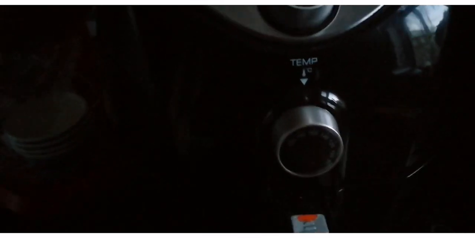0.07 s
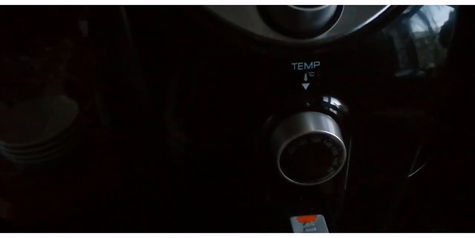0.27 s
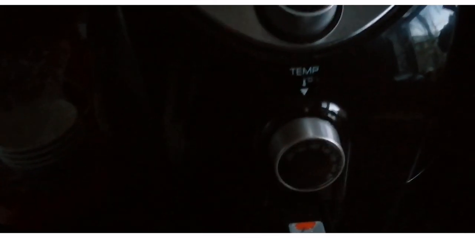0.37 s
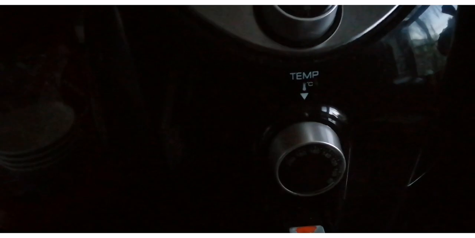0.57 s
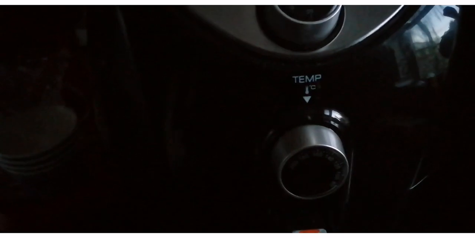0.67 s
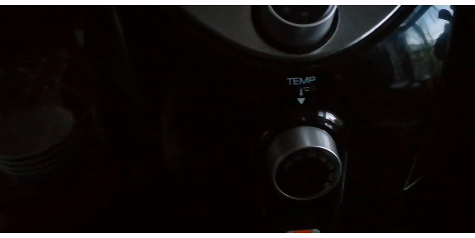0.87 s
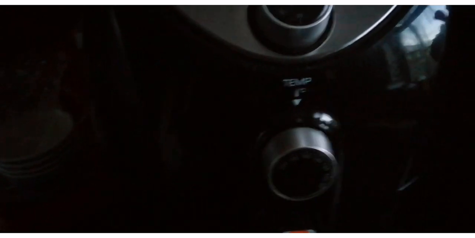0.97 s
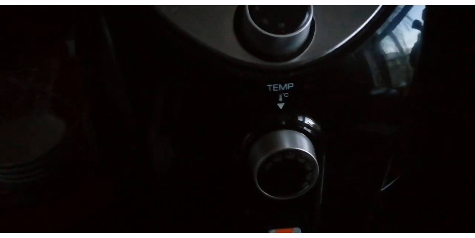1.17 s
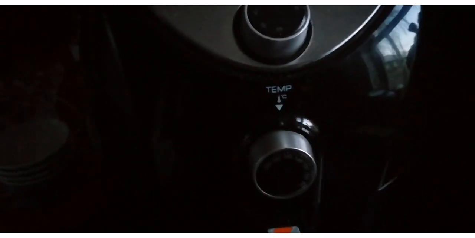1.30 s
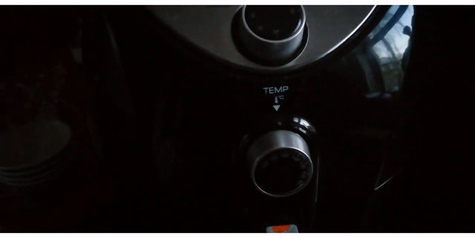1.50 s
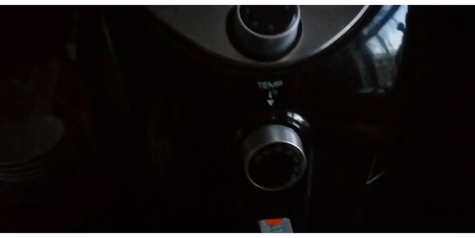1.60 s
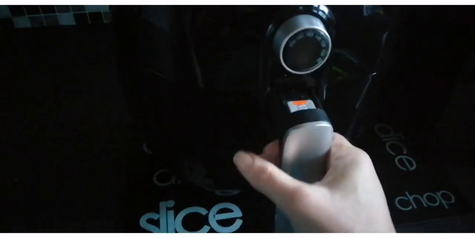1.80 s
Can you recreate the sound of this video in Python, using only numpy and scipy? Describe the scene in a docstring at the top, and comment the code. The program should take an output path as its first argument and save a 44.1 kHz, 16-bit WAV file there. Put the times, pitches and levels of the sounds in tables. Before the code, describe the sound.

Sharp clack of an air fryer basket latching, then a thud, faint ticks and fan hum.

```python
"""An air fryer's basket is pushed home, close by, in a small kitchen.
The plastic housing groans as the basket slides, the latch snaps with a sharp double clack
and the basket thuds into its seat. With a second thud the fan starts and runs up,
whining briefly and humming, while the clockwork timer ticks."""
import sys
import numpy as np
from scipy import signal
from scipy.fft import rfft, irfft, next_fast_len
from scipy.io import wavfile

SR = 44100
rng = np.random.default_rng(int(sys.argv[2]) if len(sys.argv) > 2 else 0)


def dump_mix(stems):
    """Bounce the given channels to the path in sys.argv[1] as a 16-bit WAV at rate SR."""
    frames = np.atleast_2d(stems).T  # one column per channel
    limited = np.clip(frames, -1, 1)  # hard clip at full scale
    pcm = np.round(limited * 32767).astype(np.int16)
    wavfile.write(sys.argv[1], SR, pcm)


N = 81585
T = np.arange(N) / SR


def from_db(db):
    """Turn decibels into a number to multiply by."""
    return 10 ** (np.asarray(db) / 20)


def level(rows):
    """Join (t/s, level/dB) points into a volume curve."""
    return from_db(np.interp(T, *np.transpose(rows)))


def at_hz(points, hz):
    """Read between a table's frequencies, giving each octave equal room."""
    freqs, values = np.transpose(points)
    return np.interp(np.log(hz + 1), np.log(freqs), values)


def pan(db):
    """Left and right volumes, with the left louder by db (negative leans right)."""
    gains = from_db(np.array([[db], [-db]]) / 2)
    return gains / np.sqrt(np.mean(gains ** 2))


# how alike left and right sound: f/Hz, likeness (1 = the same, 0 = unrelated)
STEREO_LIKENESS = [(50, 0.74), (250, 0.93), (500, 0.65), (1000, 0.22), (3000, -0.064), (7000, -0.041),
                   (16000, -0.25)]

def noise(spectrum):
    """Stereo noise of strength 1, shaped by (f/Hz, level/dB) points; the treble spreads widest."""
    size = next_fast_len(N)
    hz = np.arange(size // 2 + 1) * SR / size
    alike = np.clip(at_hz(STEREO_LIKENESS, hz), -1, 1)
    mid, side = rfft(rng.standard_normal((2, size)))
    stereo = np.sqrt(1 + alike) * mid + np.sqrt(1 - alike) * side * [[1], [-1]]
    x = irfft(from_db(at_hz(spectrum, hz)) * stereo, size)[:, :N]
    return x / x.std()


def drift(rate_hz):
    """A smooth random wobble of typical size 1; a higher rate wobbles faster."""
    pole = np.exp(-2 * np.pi * rate_hz / SR)
    x = signal.lfilter([1], [1, -2 * pole, pole * pole], rng.standard_normal(2 * N))[N:]
    return (x - x.mean()) / x.std()


def decay(start, fade_s, rise_s):
    """The volume of a blow: it rises quickly and drops 60 dB in each fade time."""
    age = np.maximum(T - start, 0)
    attack = 1 - np.exp(-(age / rise_s) ** 2)
    return attack * np.exp(-np.minimum(np.log(1000) * age / fade_s, 40))


def strike(start, notes, rise_s, stretch=1, lag_s=0):
    """A struck part rings at its own notes; the waves on the right run lag_s behind."""
    out = np.zeros((2, N))
    for hz, db, fade_s in notes:
        phase = 2 * np.pi * hz * (T - start - np.array([[0], [lag_s]])) + rng.normal(0, 0.88)
        out += from_db(db + rng.normal(0, 1)) * decay(start, fade_s * stretch, rise_s) * np.sin(phase)
    return out


def tone(hz, wander_hz, rate_hz):
    """A plain tone of strength 1 whose pitch wavers."""
    return np.sqrt(2) * np.sin(2 * np.pi * np.cumsum(hz + wander_hz * drift(rate_hz)) / SR)


# loudness of the room's background: t/s, level/dB
BACKGROUND_LEVEL = [(0, -51.5), (.38, -85), (.41, -69), (.55, -58.5), (.66, -71), (.8, -56), (1.85, -63)]
# its mix of low and high sound: f/Hz, level/dB
BACKGROUND_SPECTRUM = [(25, -1.5), (45, -8), (70, 4.5), (120, 5), (220, 8), (320, -2.5), (480, -3),
                       (800, -13), (1500, -17.5), (4000, -24), (6500, -23.5), (8500, -39), (16000, -34)]

def background():
    """The room's quiet, low noise, which dips around the clack."""
    return level(BACKGROUND_LEVEL) * noise(BACKGROUND_SPECTRUM) * pan(db=2)


# loudness of the shaking housing, scraping runners and rubbing plastic: t/s, level/dB
GROAN_LEVEL = [(0, -57.5), (.04, -57.5), (.10, -66), (.192, -66), (.207, -38.5), (.216, -46), (.223, -49),
               (.234, -37.5), (.25, -24.5), (.272, -28), (.293, -40), (.303, -33), (.311, -36.5),
               (.323, -27.5), (.34, -36.5), (.36, -46.5), (.385, -39.5), (.40, -66), (.45, -95)]
SCRAPE_LEVEL = [(0, -63.5), (.17, -63), (.235, -55), (.275, -58), (.288, -54), (.305, -55.5), (.333, -53),
                (.355, -51.5), (.38, -60.5), (.44, -63), (.56, -73.5)]
HISS_LEVEL = [(0, -55), (.07, -57.5), (.1, -53), (.17, -59), (.21, -56), (.33, -60), (.40, -50.5),
              (.52, -54.5), (.60, -66), (.69, -71.5), (.9, -71.5), (1.28, -70.5), (1.35, -64), (1.42, -71),
              (1.85, -69)]
# the noise each of the three makes: f/Hz, level/dB
RUMBLE_SPECTRUM = [(30, -33), (60, -16), (95, 3.5), (170, 9), (250, 6), (310, -6.5), (460, -6), (600, -26),
                   (1500, -42)]
SCRAPE_SPECTRUM = [(200, -19), (420, -3.5), (800, 5), (1300, -4), (2000, -10), (3200, -15), (4200, -27.5),
                   (9000, -28)]
HISS_SPECTRUM = [(1500, -20.5), (2900, -8.5), (4000, -15), (5200, -4), (6700, -0.5), (7300, 0),
                 (8200, -14.5), (10000, -20.5), (13000, -28), (15000, -24), (16500, -34)]

def slide():
    """The basket judders at the housing's own note while its runners scrape and hiss."""
    judder = tone(hz=207, wander_hz=3.5, rate_hz=56)
    rumble = from_db(-15.5) * noise(RUMBLE_SPECTRUM)
    groan = level(GROAN_LEVEL) * (judder + rumble)
    scrape = level(SCRAPE_LEVEL) * noise(SCRAPE_SPECTRUM)
    grain = from_db(2.5 * drift(rate_hz=110))
    hiss = level(HISS_LEVEL) * noise(HISS_SPECTRUM)
    return groan * pan(db=-8) + scrape * grain * pan(db=-5) + hiss * pan(db=1)


# short scuffs of plastic: t/s, level/dB, time to swell or fade/s
SCUFFS = [(.01, -61.5, 0.06), (0.756, -66, 0.053)]
# their thin rasp: f/Hz, level/dB
SCUFF_SPECTRUM = [(900, -32), (1700, -9), (2700, 6), (3300, 4.5), (4200, -14), (8000, -35)]

def scuffs():
    """Plastic rubs briefly, so its noise swells and fades."""
    rasp = noise(SCUFF_SPECTRUM) * pan(db=-5)
    return sum(from_db(db) * rasp * np.exp(-((T - peak) / width) ** 2) for peak, db, width in SCUFFS)


# moments when the runners catch: t/s, level/dB, pan/dB
CATCHES = [(0.2864, -46, -4), (0.33, -46, -8), (0.7523, -52.5, 7)]
# the knock they make: f/Hz, level/dB
CATCH_SPECTRUM = [(250, -1), (450, 6.5), (850, -2.5), (1300, -3.5), (1800, -12.5), (2700, -13.5),
                  (3500, -31), (5000, -19), (10000, -47)]

def catches():
    """The runners catch on small ridges, each time with a sudden knock."""
    knock = noise(CATCH_SPECTRUM)
    return sum(from_db(db) * pan(side) * knock * decay(start, fade_s=0.21, rise_s=0.00021)
               for start, db, side in CATCHES)


# snaps of the latch: t/s, level/dB, pan/dB, fade time multiplier, crack level/dB
SNAPS = [(.3455, -34, -6, 1.6, -3), (.3895, -11, 4, .4, 1), (.3977, -18, 5, 1.0, -1),
         (.3993, -23, 6, 1.3, -9)]
# notes the latch rings at: f/Hz, level/dB, fade time/s
LATCH_NOTES = [(1550, -34, 0.027), (2586, -28.5, 0.02), (3140, -19.5, 0.0065), (5220, -24, .03),
               (6000, -11, 0.0086), (6460, -3.5, 0.013), (6910, 4.5, 0.0099), (7200, -25, 0.017),
               (8690, -11, .008), (10030, -14.5, 0.0068), (12600, -30, 0.011), (14300, -21, 0.0022)]
# the crack of a small hard hit, in the timer too: f/Hz, level/dB
CRACK_SPECTRUM = [(300, -33), (1500, 2), (4000, -12), (6500, -2), (9000, 2), (11500, -1), (14800, 1),
                  (16500, -6)]

def latch():
    """The latch scuffs, trips and snaps shut: a crack and a short bright ring each time."""
    crack_noise = from_db(-10.5) * noise(CRACK_SPECTRUM) * pan(db=-3)
    boost_db, crack_fade_s, rise_s = 1.5, 0.012, 0.00035
    out = 0
    for start, db, side, stretch, crack_db in SNAPS:
        ring = strike(start, LATCH_NOTES, rise_s, stretch, lag_s=0.00005) * pan(side)
        crack = from_db(crack_db) * crack_noise * decay(start, crack_fade_s * stretch, rise_s / 2)
        out += from_db(db + boost_db) * (ring + crack)
    return out


# the sound the kitchen throws back: f/Hz, level/dB
ECHO_SPECTRUM = [(200, -2), (1800, 6), (4000, 10), (7000, -4.5), (10000, 0.5), (15000, 3.5)]

def kitchen(sound):
    """Sound bounces quickly off the worktop, then dies away around the room."""
    early = decay(start=0.00037, fade_s=0.035, rise_s=0.00079)
    late = decay(start=0.0013, fade_s=0.37, rise_s=0.0071)
    fade = from_db(-7.5) * early / np.linalg.norm(early) + from_db(-8.5) * late / np.linalg.norm(late)
    echo = noise(ECHO_SPECTRUM) * fade
    return signal.fftconvolve(sound[:1], echo, axes=1)[:, :N]   # the left side feeds both echoes


# jolts as the basket seats and the fan starts: t/s, level/dB, pan/dB, rattle level/dB
THUDS = [(.431, -39.5, -5, -1), (0.7038, -30.5, -4, -4.5)]
# notes the housing rings at: f/Hz, level/dB, fade time/s
HOUSING_NOTES = [(121, -28, 0.2), (214.1, -0.5, 0.36), (243.7, -13, 0.55), (302, -5.5, 0.073),
                 (394.5, -4.5, 0.2), (424, -15, 0.56), (450, -11.5, 0.4), (500, -41, .23), (614, -25, 0.44),
                 (640, -22, 0.17), (800, -37, 0.31), (825, -26, 0.72), (1055, -23, 0.21)]
# its rattle: f/Hz, level/dB
RATTLE_SPECTRUM = [(50, 2), (200, -13), (500, 7), (1050, -1.5), (1500, -19), (3000, -19), (4200, -20),
                   (5500, -12.5), (7200, -10), (8500, -32), (15000, -47)]

def thuds():
    """A jolt shakes the hollow housing, which booms and rattles briefly."""
    rattle_noise = from_db(-11.5) * noise(RATTLE_SPECTRUM)
    out = 0
    for start, db, side, rattle_db in THUDS:
        boom = strike(start, HOUSING_NOTES, rise_s=0.004) * pan(side)
        rattle = from_db(rattle_db) * rattle_noise * decay(start, fade_s=0.3, rise_s=0.001)
        out += from_db(db) * (boom + rattle)
    return out


# soft bumps of handling: t/s, level/dB
BUMPS = [(0.433, -41), (1.435, -46)]
# their deep thump: f/Hz, level/dB
BUMP_SPECTRUM = [(30, -39), (70, -14), (110, 3), (165, 0.5), (240, -9), (500, -52)]

def bumps():
    """Handling the fryer makes low thumps that start gently."""
    thump = noise(BUMP_SPECTRUM) * pan(db=-1)
    return sum(from_db(db) * thump * decay(start, fade_s=0.21, rise_s=0.014) for start, db in BUMPS)


# whine of the starting motor: t/s, f/Hz, level/dB
MOTOR_WHINE = [(0.698, 387.4, -74.5), (0.726, 397.8, -39), (.77, 405.8, -50.5), (0.824, 445, -50.5),
               (0.854, 470.7, -67), (.88, 468, -54), (0.921, 485, -76), (.98, 500, -73), (1.03, 538, -58),
               (1.09, 559, -73), (1.129, 634, -66), (1.16, 646, -72), (1.22, 722, -88)]

def motor():
    """The starting motor whines upward and fades into the air noise."""
    times, hz, db = np.transpose(MOTOR_WHINE)
    roughness_db = 3 * drift(rate_hz=30)
    whine = tone(np.interp(T, times, hz), wander_hz=5.9, rate_hz=34.7)
    return from_db(np.interp(T, times, db) + roughness_db) * whine * pan(db=-4)


# loudness of the fan's air and of the humming housing: t/s, level/dB
AIR_LEVEL = [(0, -69.5), (.68, -75.5), (.85, -66), (1.05, -57), (1.3, -53), (1.6, -52), (1.85, -52.5)]
HUM_LEVEL = [(0, -85), (.72, -105), (.8, -46.5), (.89, -60), (.93, -53), (1.02, -47), (1.07, -72),
             (1.24, -55), (1.5, -67.5), (1.58, -47), (1.7, -58.5), (1.78, -56), (1.82, -42), (1.85, -58)]
# the rush of air: f/Hz, level/dB
AIR_SPECTRUM = [(30, -11), (70, -33.5), (115, -0.5), (160, -4.5), (250, 8.5), (300, 0), (400, 1.5),
                (560, -11.5), (820, -9.5), (1300, -8), (1650, -13.5), (2150, -12), (3000, -20),
                (4100, -28.5), (5300, -19.5), (7000, -21), (8500, -37), (12000, -53.5), (15500, -65)]

def fan():
    """Air noise grows and brightens as the fan speeds up; the motor makes the housing hum."""
    split_hz, dull_db, full_speed_s = 1500, -21.5, 1.7
    air = noise(AIR_SPECTRUM)
    low = signal.sosfiltfilt(signal.butter(2, split_hz, fs=SR, output="sos"), air)
    high = (air - low) * from_db(dull_db * np.clip(full_speed_s - T, 0, 1))   # the treble arrives last
    rush = low * pan(db=-3) + high * pan(db=-0.5) + duct() * pan(db=9.5)
    housing_hum = level(HUM_LEVEL) * tone(hz=208.2, wander_hz=9.2, rate_hz=33)
    mains_hum = from_db(-67.5) * tone(hz=118, wander_hz=4.9, rate_hz=38.6)
    return level(AIR_LEVEL) * rush + (housing_hum + mains_hum) * pan(db=-3)


# breathy notes in the fan's air: f/Hz, width/Hz, level compared with the air/dB
DUCT_NOTES = [(266, 9, -12.5), (347.3, 34, -15.5), (410, 25, -12.5), (452, 10, -23), (811, 12, -19.5)]

def duct():
    """Moving air makes the housing sing unevenly at a few notes."""
    out = 0
    for hz, width, db in DUCT_NOTES:
        band = signal.lfilter(*signal.iirpeak(hz, hz / width, fs=SR), noise(AIR_SPECTRUM))
        flutter_db = 3 * drift(rate_hz=5.7)
        out += from_db(db + flutter_db) * band / band.std()
    return out


# ticks of the timer: t/s, level/dB, pan/dB, click level/dB
TICKS = [(0.8094, -46.5, 9, -14), (1.054, -42.5, 28, -13), (1.2938, -46.5, 4, -8.5),
         (1.539, -45.5, 15, -5.5), (1.7786, -45, 28, -13)]
# notes its clockwork rings at: f/Hz, level/dB, fade time/s
CLOCKWORK_NOTES = [(5150, -4.5, 0.014), (6060, -10, 0.015), (7175, 1, 0.025), (8040, -10.5, 0.011),
                   (10420, -13, .011), (12800, -23, .008), (15000, -19, .008)]

def timer():
    """The clockwork ticks about four times a second: a dry click and a short ring."""
    crack_noise = noise(CRACK_SPECTRUM)
    out = 0
    for start, db, side, click_db in TICKS:
        ring = strike(start, CLOCKWORK_NOTES, rise_s=0.00068, lag_s=0.00005)
        click = from_db(click_db) * crack_noise * decay(start, fade_s=0.012, rise_s=0.00036)
        out += from_db(db) * pan(side) * (ring + click)
    return out


# loudness of a light brush over the plastic: t/s, level/dB
BRUSH_LEVEL = [(1.225, -88), (1.238, -59), (1.251, -53.5), (1.268, -62), (1.30, -66), (1.33, -81)]
# its bright swish: f/Hz, level/dB
BRUSH_SPECTRUM = [(3000, -10), (5000, -13.5), (6500, 1), (8500, -13.5), (12500, -12.5), (15000, -5),
                  (16500, -2)]

def brush():
    """Light rubbing on the plastic makes one short, soft swish."""
    return level(BRUSH_LEVEL) * noise(BRUSH_SPECTRUM) * pan(db=-15)


def scene():
    """Basket, fan and timer over the quiet background; only the latch and the ticks echo."""
    clack, ticks = latch(), timer()
    echo = kitchen(clack + from_db(-3.5) * ticks)
    basket = slide() + clack + thuds()
    handling = catches() + scuffs() + bumps() + brush()
    return basket + handling + motor() + fan() + ticks + echo + background()


def record(dry):
    """The sharpest peaks are rounded off and the very highest treble is cut away."""
    ceiling, cutoff_hz = 0.26, 16200
    rounded = ceiling * np.tanh(dry / ceiling)
    return signal.sosfilt(signal.ellip(10, .2, 80, cutoff_hz, fs=SR, output="sos"), rounded)


dry = scene()
out = record(dry)
dump_mix(out)
```